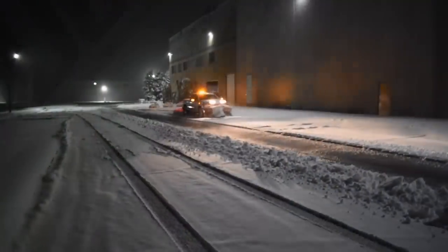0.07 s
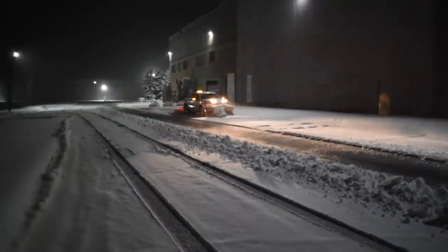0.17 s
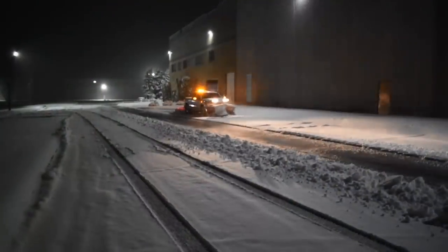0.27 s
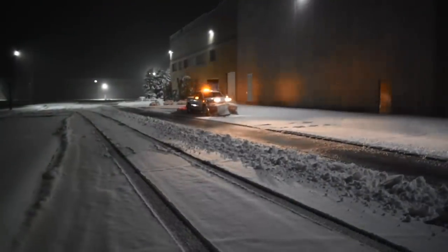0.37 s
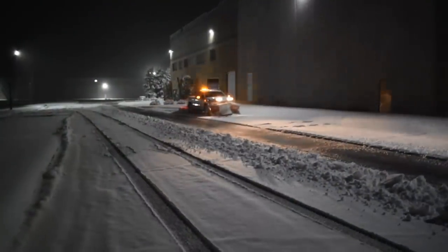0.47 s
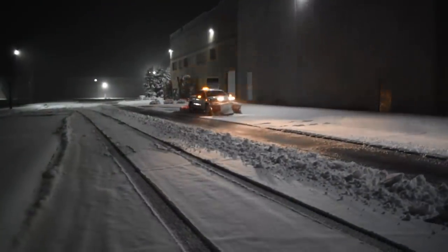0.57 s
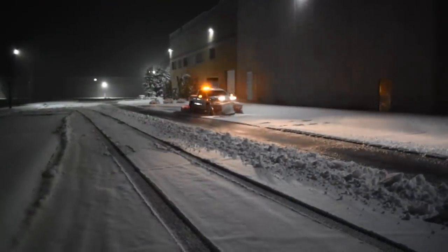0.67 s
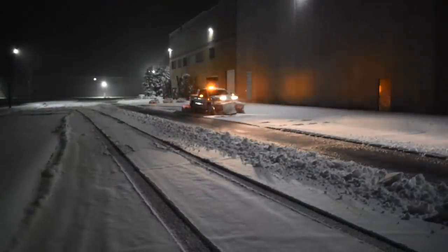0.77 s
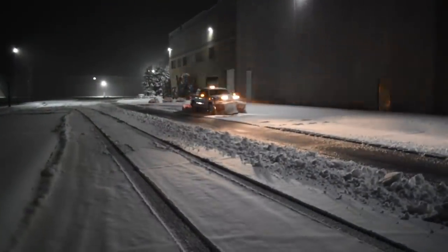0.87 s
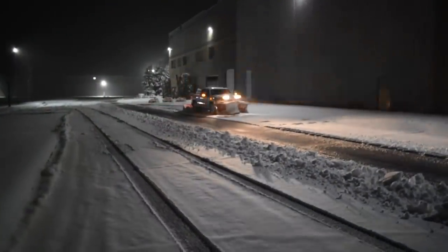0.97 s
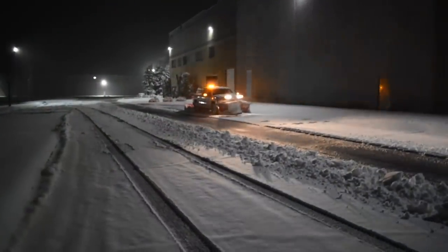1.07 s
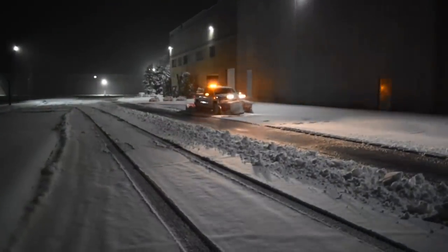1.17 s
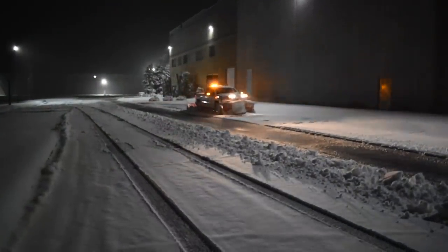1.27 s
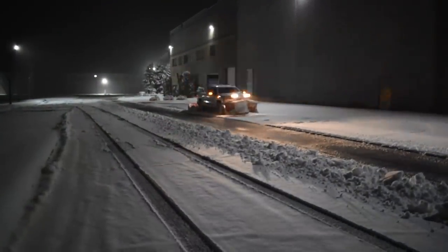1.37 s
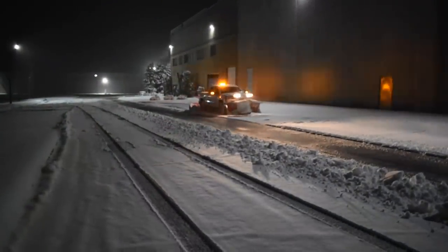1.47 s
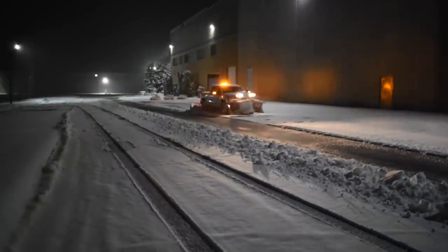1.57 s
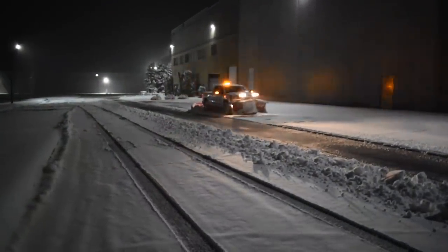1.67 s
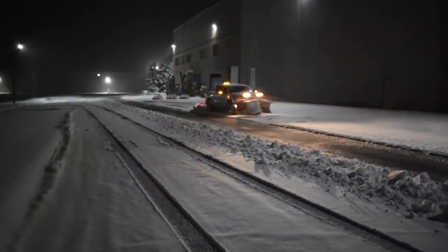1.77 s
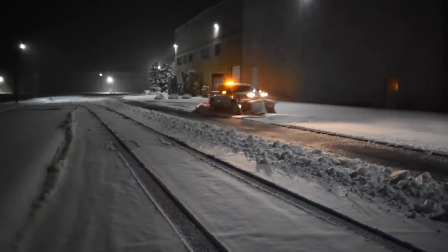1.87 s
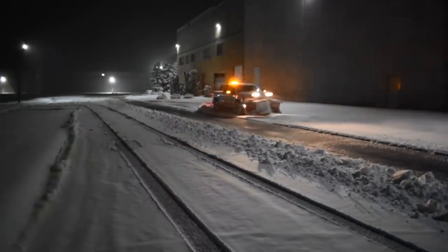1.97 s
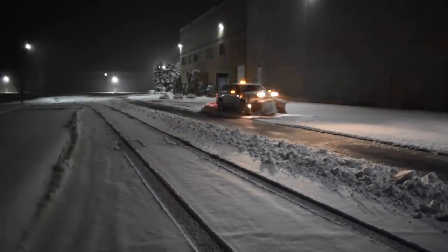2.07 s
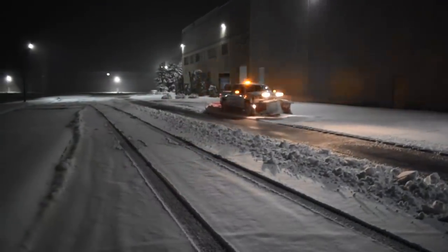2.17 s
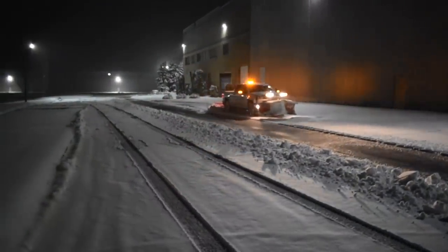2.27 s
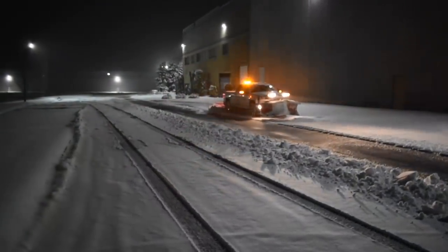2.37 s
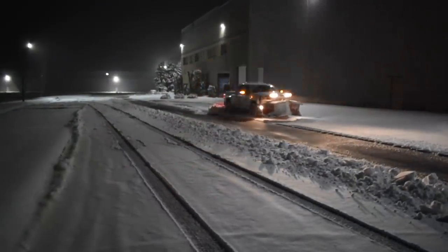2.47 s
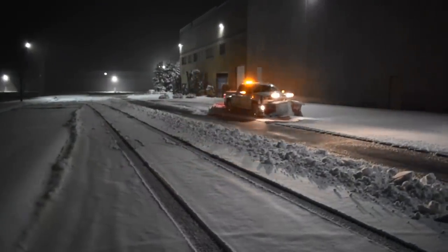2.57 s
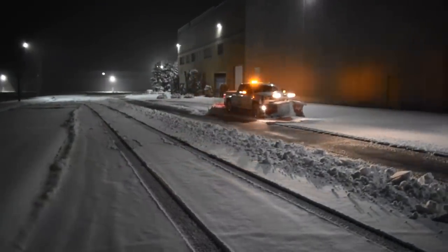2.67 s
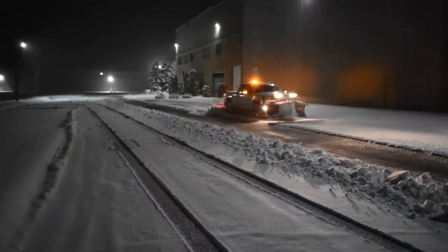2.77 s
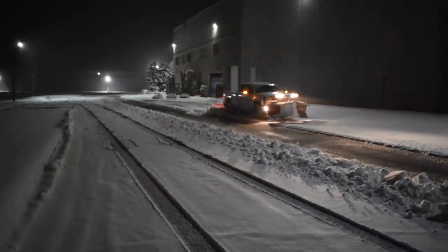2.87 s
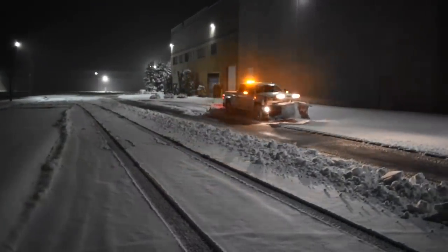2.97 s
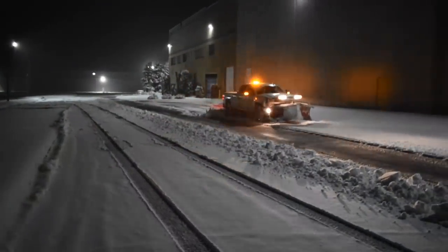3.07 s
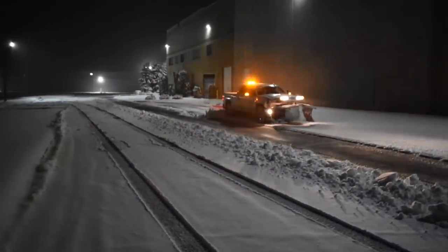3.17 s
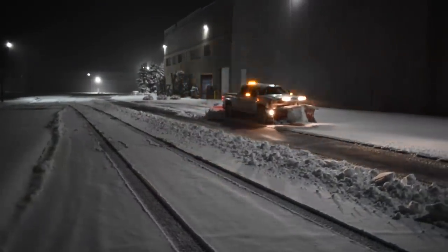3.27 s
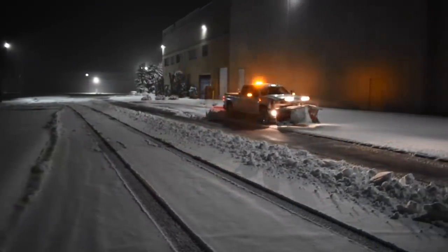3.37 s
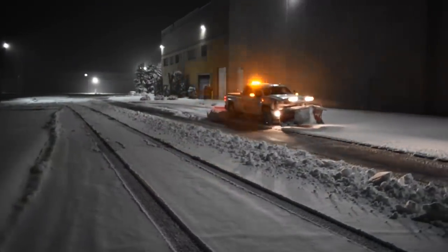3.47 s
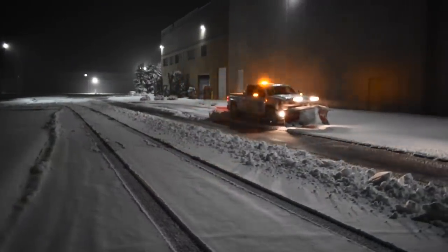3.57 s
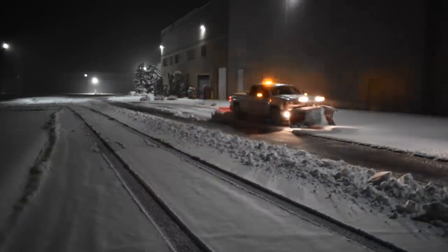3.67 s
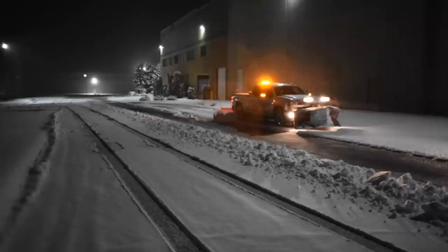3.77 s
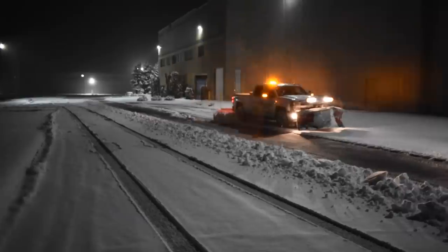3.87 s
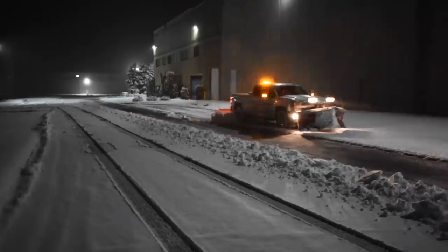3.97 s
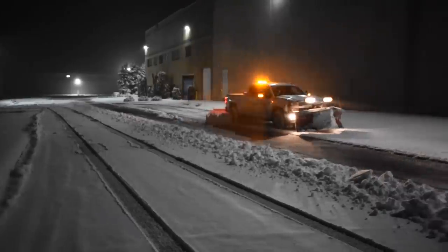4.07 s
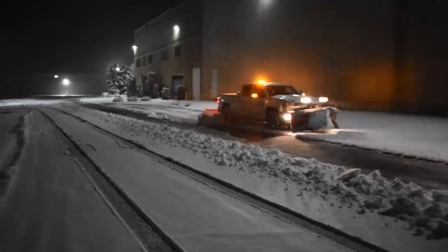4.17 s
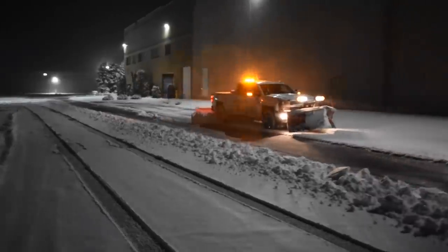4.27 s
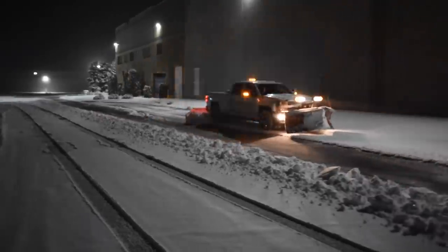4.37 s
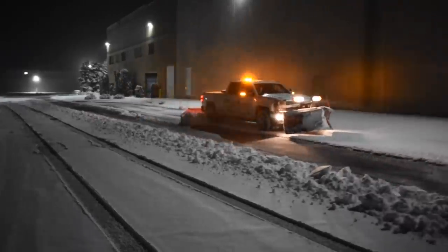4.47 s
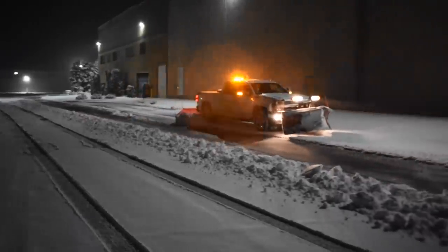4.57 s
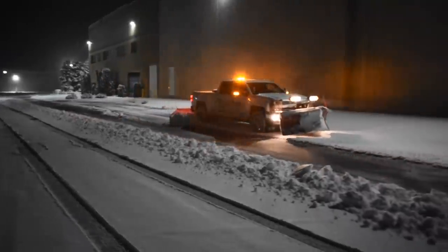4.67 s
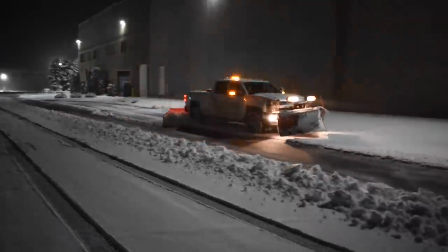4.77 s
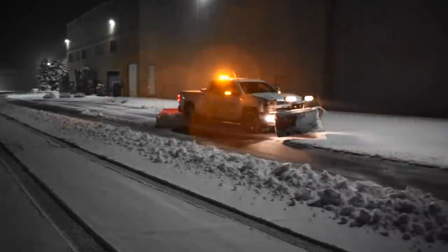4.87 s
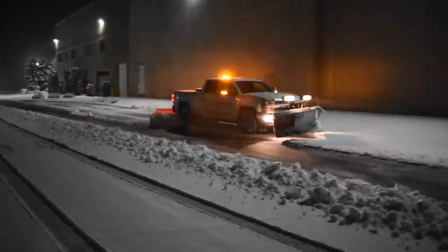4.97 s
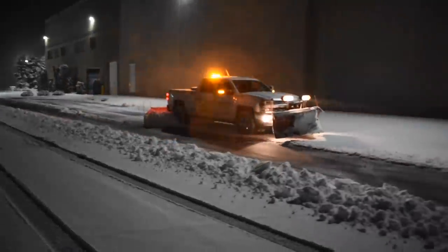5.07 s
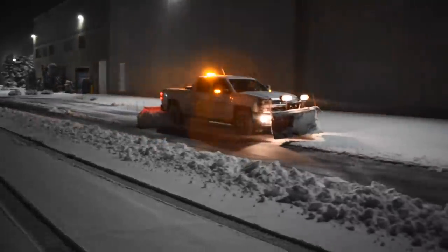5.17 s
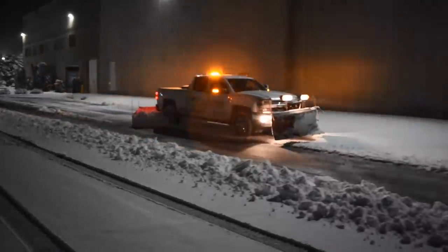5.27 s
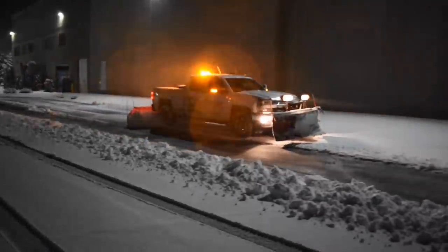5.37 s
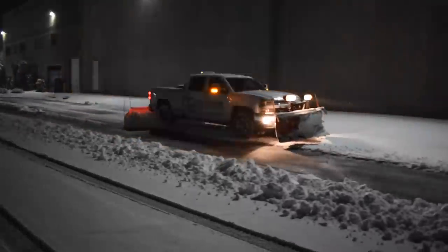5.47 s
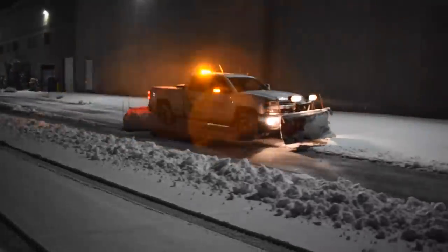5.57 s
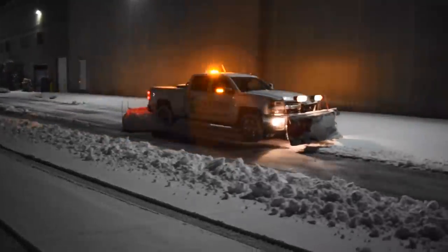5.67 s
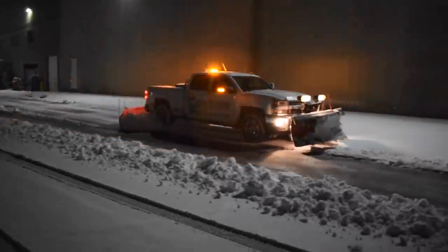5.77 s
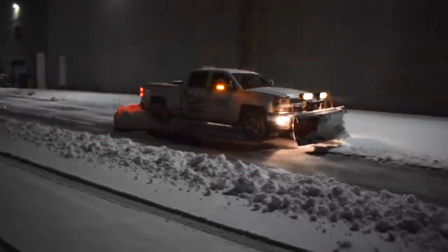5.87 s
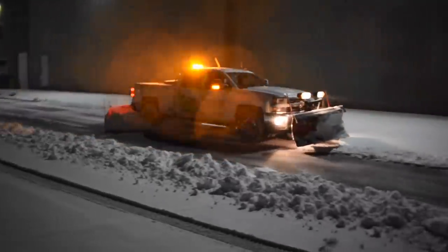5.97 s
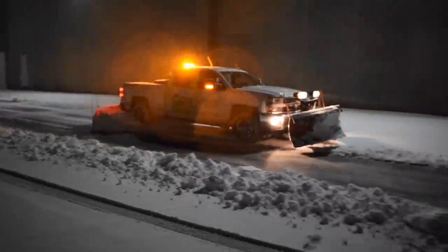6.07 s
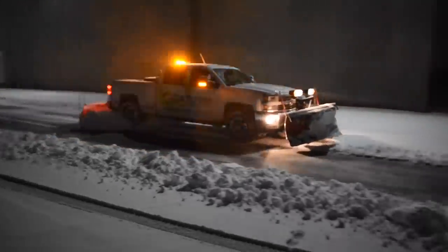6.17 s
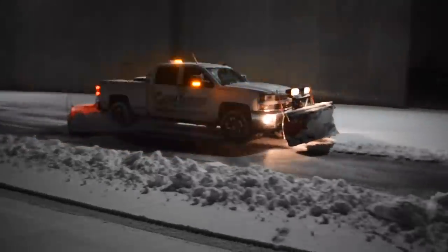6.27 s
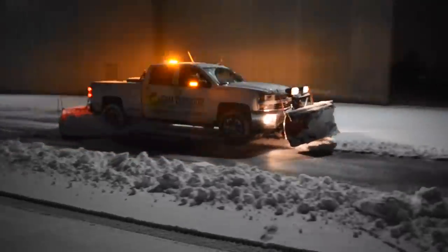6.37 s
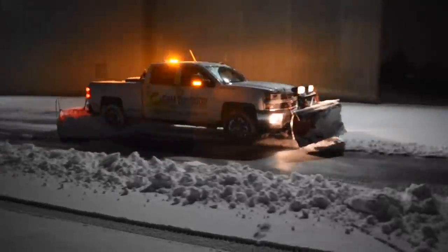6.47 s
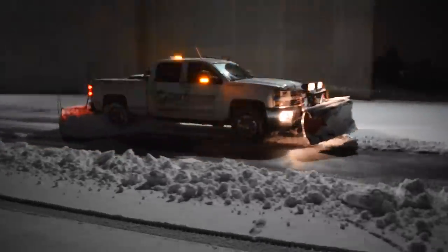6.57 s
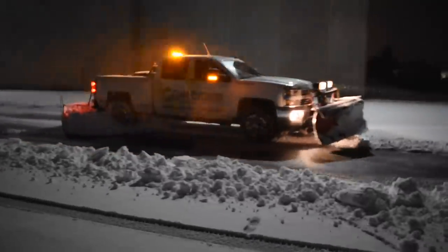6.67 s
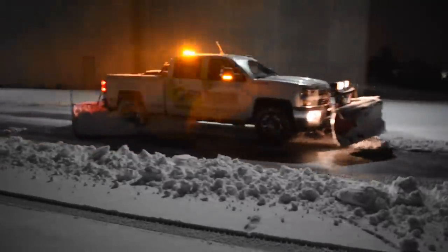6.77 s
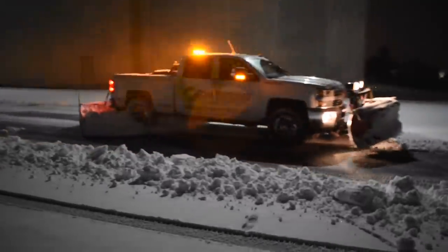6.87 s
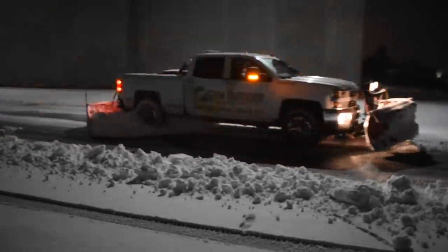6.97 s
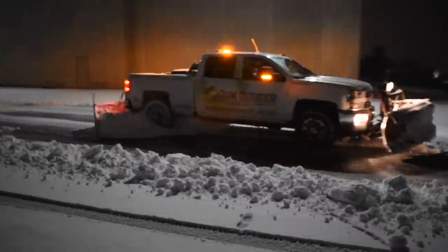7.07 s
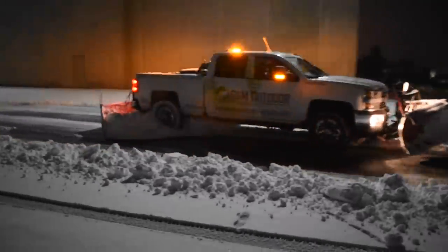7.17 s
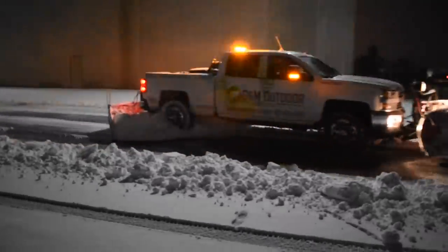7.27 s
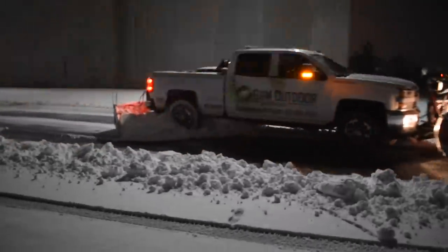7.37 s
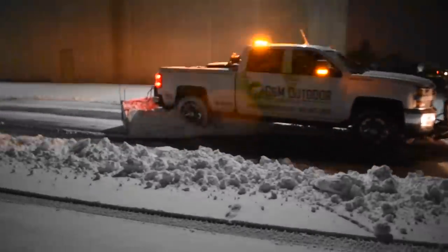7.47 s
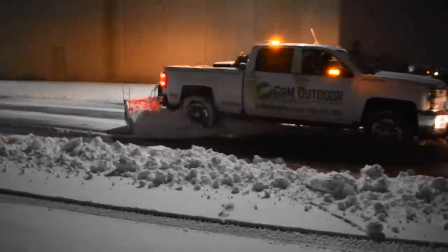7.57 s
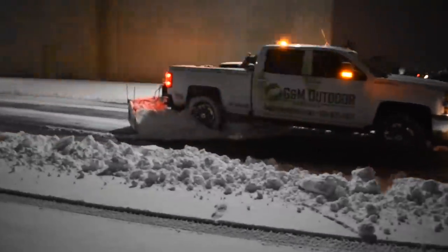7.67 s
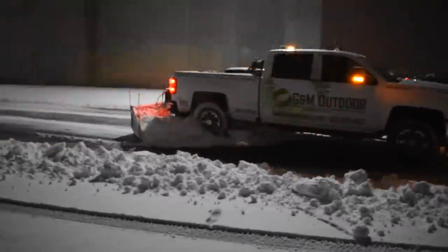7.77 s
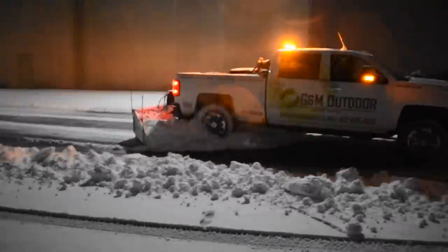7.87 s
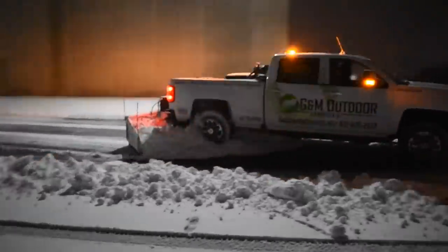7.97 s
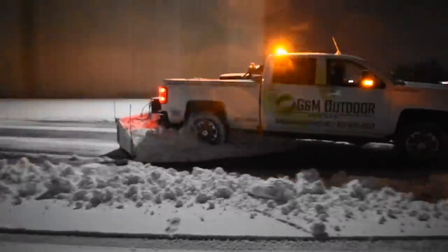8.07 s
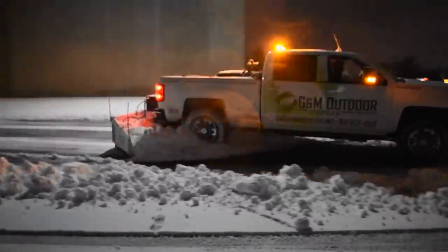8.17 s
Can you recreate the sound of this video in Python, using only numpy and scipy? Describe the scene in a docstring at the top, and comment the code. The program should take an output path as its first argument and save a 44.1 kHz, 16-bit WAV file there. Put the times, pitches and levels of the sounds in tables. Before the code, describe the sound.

A pickup truck plows wet snow outdoors, growing steadily louder as it slowly approaches. From the start its low exhaust burbles over the dull roar of pushed snow, with a thin, faint whine until about 3 seconds. Small distant blade scrapes and ticks come around 1 and 2 seconds. At about 4.3 seconds the engine sags as the driver lifts off, recovering by 5, while a damp brake gives a few faint, very high squeaks. Slush hisses and crackles more brightly as the truck nears. From 5.5 seconds the steel edge grates on pavement, hardest between 6 and 6.4, with sharp clacks and one dull knock. More gritty scrapes and clacks follow around 6.8, 7.1 and 7.6 seconds. The truck is alongside, a few metres away, from about 7 seconds to the end. A wall faintly echoes the plow, and light wind buffets the microphone, gusting near 6.4 and 8 seconds.

```python
"""Pickup ploughing snow at night

A V8 pickup ploughs wet snow along a warehouse wall, nearing slowly until it passes a few metres away.
The exhaust burbles and sags once as the driver lifts off. Pushed snow roars dully and slush hisses;
now and then the steel edge grates and clacks on bare pavement and a damp brake squeaks.
The wall echoes the plough; light wind buffets the microphone."""
import sys
import numpy as np
from scipy import signal
from scipy.fft import rfft, irfft
from scipy.io import wavfile

SR = 44100
rng = np.random.default_rng(int(sys.argv[2]) if len(sys.argv) > 2 else 0)


def file_out(sig):
    """Save sig as 16-bit WAV at sys.argv[1]."""
    # one column per channel
    cols = np.atleast_2d(sig).T
    # limit, then scale
    lim = np.clip(cols, -1, 1)
    pcm = np.round(lim * 32767).astype(np.int16)
    wavfile.write(sys.argv[1], SR, pcm)


N = 362502
T = np.arange(N) / SR


def engine(sag_hz=2.85, jitter=0.0021, waver_db=1.3, dispersion_rad=0.1994, smear_rad=0.91):
    """V8 exhaust harmonics over a turbulent drone, with faint high harmonics from the engine bay."""
    # four-stroke cycle rate at steady throttle: t/s, f/Hz
    cruise = [(0, 12.55), (.45, 12.68), (.85, 12.38), (1.6, 12.9), (1.85, 13.4), (3.1, 14.38), (4.2, 14.25),
              (5.45, 14.3), (6.4, 13.75), (7.35, 13.51), (8.0, 14.0)]
    # exhaust harmonics: multiple of cycle rate, gain ahead/dB, gain side/dB
    harmonics = [(3, -3.5, -11), (5, 0, 1), (6, -4.5, -15), (7, -2.5, -1.5), (8, 0, -0.5), (10, -16, -5.5),
                 (11, -10.5, -17), (12, -18.5, -11.5), (13, -12.5, -21), (14, -8.5, -29.5),
                 (16, -15.5, -19.5), (18, -37.5, -11.5), (19, -45, -18.5), (20, -48, -14)]
    # drive of the firing tone and its octave: t/s, level/dB
    firing = [(0, -25), (1.5, -25.5), (2, -32), (2.4, -28), (2.9, -26), (3.5, -29.5), (4.25, -26),
              (4.55, -18), (4.75, -14.5), (4.88, -20), (7.5, -18), (7.95, -13.5), (8.22, -16)]
    # deep hum (harmonic 5) over the burble: t/s, gain/dB
    hum = [(0, 0), (1.6, 6), (2.85, -7.5), (3.7, 1), (5.1, 3), (5.9, -2), (6.4, -4.5), (7.5, 1.5),
           (8.22, -0.5)]
    # exhaust turbulence spectrum: f/Hz, level/dB
    drone = [(15, -5), (32, -6.5), (48, -2), (70, -2), (135, 2), (190, -7.5), (220, -16.5), (400, -31.5),
             (1500, -76)]
    side, lift, firing_db = side_view(), lift_off(), in_time(firing)
    cycle_hz = (in_time(cruise) - sag_hz * lift) * (1 + jitter * drift(6.7))
    cycle_rad = 2 * np.pi * np.cumsum(cycle_hz) / SR
    burble_db = at_distance(-20.5, falloff=0.9) - 4.5 * lift  # uneven banks burble more under load
    drive_db = {5: burble_db + in_time(hum), 8: firing_db, 16: firing_db}
    exhaust = np.zeros(N)
    for k, ahead_db, side_db in harmonics:
        level_db = drive_db.get(k, burble_db) + ahead_db + side * (side_db - ahead_db)
        level_db += waver_db * drift(4.1)
        # low harmonics stay in step and throb once a cycle; the silencer delays higher ones
        lag_rad = dispersion_rad * (k - 6) ** 2 + smear_rad * drift(0.46)
        exhaust += np.sqrt(2) * from_db(level_db) * np.sin(k * cycle_rad - lag_rad)
    exhaust += from_db(6.5) * resonate(exhaust, hz=182, width_hz=13)  # tailpipe boom
    exhaust -= from_db(-1.5) * resonate(exhaust, hz=226, width_hz=22)  # silencer side chamber
    bay = sum(from_db(3 * drift(1.5)) * np.sin(k * cycle_rad + rng.uniform(0, 2 * np.pi))
              for k in range(27, 56))
    drone_gain = from_db(at_distance(-21.5, falloff=0.73))
    return exhaust + drone_gain * (noise(drone) + from_db(-26.5) * bay)


def lift_off():
    """Throttle lift: 0 at steady throttle, towards 1 with the foot off."""
    return swell_and_fade(start_s=4.24, length_s=0.53, attack_s=0.2, release_s=0.13)


def pushed_snow(churn_db=0.5, lift_db=-3.5):
    """Snow rolls ahead of the blade with a dull roar and sets the frame humming."""
    # rolling snow spectrum: f/Hz, level/dB
    rolling = [(130, -19), (230, 5.5), (310, -1.5), (480, 2.5), (800, 0.5), (1100, -1), (1350, -4),
               (1550, -4.5), (1850, -12), (2500, -14.5), (4000, -22.5), (8000, -34), (16000, -62)]
    # plough frame modes: f/Hz, width/Hz, gain ahead/dB, gain side/dB
    frame_modes = [(373.4, 26, -8.5, -30), (463.6, 12, -14, -12.5), (554, 54, -41, -8.5),
                   (653, 16, -22, -19), (768, 21, -22, -14)]
    side = side_view()
    roar, drag = noise(rolling), rng.standard_normal(N)
    for hz, width_hz, ahead_db, side_db in frame_modes:
        roar += from_db(ahead_db + side * (side_db - ahead_db)) * rms_one(resonate(drag, hz, width_hz))
    level_db = at_distance(-25, falloff=0.58) + lift_db * lift_off() + churn_db * drift(29)
    return from_db(level_db) * roar


def slush(shadow_db=-11.5, crackle_db=-7, flutter_db=0.38):
    """Slush hisses and crackles under the tyres; the blade hides them from ahead."""
    # slush spectrum: f/Hz, level/dB
    spectrum = [(400, -2), (1200, 9.5), (2500, 8.5), (3600, 3.5), (6000, 3), (8000, -1.5), (10000, -3),
                (16000, -10.5)]
    hiss = rng.standard_normal(N) + from_db(crackle_db) * crunch(per_s=500, spread_db=1.5, decay_s=0.00095)
    level_db = at_distance(-26.5, falloff=0.95) + shadow_db * (1 - side_view()) + flutter_db * drift(22)
    return from_db(level_db) * rms_one(colour(hiss, spectrum))


def scraping(slide_db=-4, bear_down_db=4):
    """The edge sticks and slips over pavement, shaking the blade and crushing grit."""
    # pavement contacts: start/s, length/s, grating/dB, grit/dB
    scrapes = [(0.954, 0.044, -33.5, -40.5), (1.035, .05, -38, -48), (1.085, 0.34, -41.5, -49.5),
               (1.85, 0.05, -53, -51), (4.321, .05, -35, -39), (5.535, .05, -27, -47),
               (5.62, 0.43, -36, -41.5), (6.048, 0.35, -16.5, -32), (6.733, 0.18, -26, -30),
               (6.938, .15, -20.5, -29), (7.443, .24, -20.5, -24.5)]
    # stick-slip spectrum: f/Hz, level/dB
    slip_spectrum = [(150, -34), (400, -4), (800, 1.5), (1500, 0), (2800, -1.5), (4000, -9.5), (6000, -24),
                     (16000, -30.5)]
    # crushed grit spectrum: f/Hz, level/dB
    grit_spectrum = [(1000, 0), (3000, 2.5), (5500, 4.5), (8000, -3), (10000, -4), (16000, -16)]
    grating_gain, grit_gain = np.zeros((2, N))
    for start_s, length_s, grating_db, grit_db in scrapes:
        contact = swell_and_fade(start_s, length_s, attack_s=0.015, release_s=0.048)
        pressure = arch(start_s, length_s, skew=1.4)  # hardest just past the middle
        contact *= from_db(bear_down_db * (pressure - 1))
        grating_gain += contact * from_db(grating_db)
        grit_gain += contact * from_db(grit_db)
    slips = crunch(per_s=380, spread_db=1.5, decay_s=0.0013) + from_db(slide_db) * rng.standard_normal(N)
    grains = crunch(per_s=550, spread_db=5, decay_s=0.0024)
    grating = rms_one(blade(colour(slips, slip_spectrum), ring_db=0))
    grit = rms_one(colour(grains, grit_spectrum))
    return grating_gain * grating + grit_gain * grit


def clacks(gain_db=-3):
    """The edge snags on a joint or stone and springs free."""
    # snags: t/s, relative level/dB
    snags = [(0.9842, -35), (1.068, -39), (1.868, -32), (1.906, -27.5), (4.3654, -25), (5.036, -27.5),
             (5.5647, -22.5), (6.061, -17.5), (6.26, -10), (6.332, -11), (6.3726, -13), (6.8349, -9),
             (6.8758, -12.5), (7.105, -7), (7.6923, -8)]
    # impact spectrum: f/Hz, level/dB
    spectrum = [(300, -23), (1200, 7.5), (3000, 7), (5500, 1.5), (9000, -13), (16000, -22)]
    clicks = np.zeros(N)
    for at_s, db in snags:
        clicks[round(at_s * SR)] = from_db(db + gain_db)
    return blade(colour(bursts(clicks, decay_s=0.0034), spectrum), ring_db=-11)


def blade(contact, ring_db):
    """A contact heard directly and through the ringing steel."""
    # blade modes: f/Hz, width/Hz, gain/dB
    modes = [(816, 90, -6), (1250, 260, -1.5), (1520, 52, 4), (2100, 350, -3), (2410, 120, -4.5),
             (3090, 15, 0), (3800, 90, -11)]
    ring = sum(from_db(db) * resonate(contact, hz, width_hz) for hz, width_hz, db in modes)
    return contact + from_db(ring_db) * ring


def knock(at_s=6.3478, hz=520, width_hz=260, peak_db=-8):
    """The blade drops once against its mount with a dull knock."""
    impulse = np.full(N, 1e-18)
    impulse[round(at_s * SR)] = 1
    thud = resonate(resonate(impulse, hz, width_hz), hz, 2 * hz)
    return from_db(peak_db) * thud / np.abs(thud).max()


def squeaks(spread_hz=75, flutter_db=3):
    """A damp brake disc sings briefly, very high."""
    # brake squeaks: start/s, length/s, f/Hz, level/dB
    events = [(3.89, .08, 14150, -52), (4.52, .1, 14330, -51), (4.62, .17, 14420, -50.5),
              (6.02, .05, 14400, -43)]
    tones, waver_hz = np.zeros(N), spread_hz * drift(60)
    for start_s, length_s, hz, db in events:
        phase_rad = 2 * np.pi * np.cumsum(hz + waver_hz) / SR
        tones += from_db(db) * arch(start_s, length_s) * np.sin(phase_rad)
    return tones * from_db(flutter_db * drift(30))


def whine(level_db=-42.5):
    """A thin, unsteady engine-bay whine swells and fades while the truck is far off."""
    tone = rms_one(resonate(rng.standard_normal(N), hz=774, width_hz=4))
    return from_db(level_db) * arch(start_s=0.24, length_s=2.96) * tone


def wall_echo(x, far_s=0.018, near_s=0.045, gain_db=-18.5):
    """Reflection off the wall behind the truck; the detour lengthens as it draws alongside."""
    delay_s = far_s + (near_s - far_s) * side_view()
    return from_db(gain_db) * np.interp(T - delay_s, T, x, left=0)


def wind(breeze_db=-27):
    """Slow pressure lumps at the microphone port: a light breeze with a few gusts."""
    # gusts: peak time/s, half width/s, level/dB
    gusts = [(4.15, 0.18, -19.5), (6.44, 0.041, -11), (7.3, 1, -24), (8.1, 0.074, -9.5)]
    # buffeting spectrum: f/Hz, level/dB
    buffet = [(3, -12), (9, 2.5), (15, -4.5), (25, -12.5), (60, -46), (200, -38.5), (1000, -93)]
    gust_gain = sum(from_db(db) * np.exp(-((T - at_s) / width_s) ** 2) for at_s, width_s, db in gusts)
    return (from_db(breeze_db) + gust_gain) * noise(buffet)


def closeness(alongside_s=7.235, nearest_m=5.6, speed_m_per_s=4.0):
    """Nearest over present distance on a straight approach; holds at 1 once alongside."""
    return nearest_m / np.hypot(nearest_m, speed_m_per_s * np.maximum(alongside_s - T, 0))


def side_view():
    """Truck aspect: 0 from ahead, 1 from the side."""
    return closeness() ** 2


def at_distance(alongside_db, falloff):
    """Level/dB of a source on the truck; amplitude goes as distance ** -falloff."""
    return alongside_db + falloff * 20 * np.log10(closeness())


def swell_and_fade(start_s, length_s, attack_s, release_s):
    """Rises towards 1 for length_s, then decays."""
    held_s = np.clip(T - start_s, 0, length_s)
    released_s = np.maximum(T - start_s - length_s, 0)
    return (1 - np.exp(-held_s / attack_s)) * np.exp(-released_s / release_s)


def arch(start_s, length_s, skew=1):
    """Half-sine envelope; skew above 1 delays the peak."""
    return np.sin(np.pi * np.clip((T - start_s) / length_s, 0, 1) ** skew)


def crunch(per_s, spread_db, decay_s):
    """Random small fractures of uneven size, unit power."""
    sizes = from_db(spread_db * np.minimum(rng.exponential(1, N), 3))
    return rms_one(bursts(sizes * (rng.random(N) < per_s / SR), decay_s))


def bursts(clicks, decay_s):
    """Each click releases a decaying puff of noise."""
    envelope = signal.lfilter([1], [1, -np.exp(-1 / (decay_s * SR))], clicks + 1e-18)
    return envelope * rng.standard_normal(N)


def resonate(x, hz, width_hz):
    """One resonance, unit peak gain."""
    r = np.exp(-np.pi * width_hz / SR)
    feedback = [1, -2 * r * np.cos(2 * np.pi * hz / SR), r * r]
    return signal.lfilter(np.array([1, 0, -1]) * (1 - r * r) / 2, feedback, x)


def noise(spectrum):
    """Coloured noise, unit power."""
    return rms_one(colour(rng.standard_normal(N), spectrum))


def colour(x, spectrum, size=32768):
    """Minimum-phase filter from rows of f/Hz, gain/dB."""
    hz, db = np.transpose(spectrum)
    grid_hz = np.maximum(np.arange(size // 2 + 1) * SR / size, 1)
    gain = from_db(np.interp(np.log(grid_hz), np.log(hz), db))
    cepstrum = irfft(np.log(gain))[:size // 2]
    cepstrum[1:] *= 2
    response = irfft(np.exp(rfft(cepstrum, size)))[:size // 2]
    return signal.fftconvolve(x, response)[:N]


def drift(rate_hz, hop=40, settle=2000):
    """Slow random wander, unit spread."""
    r = np.exp(-2 * np.pi * rate_hz * hop / SR)
    white = rng.standard_normal(N // hop + settle + 2)
    slow = signal.lfilter([1], [1, -2 * r, r * r], white)[settle:]
    return np.interp(np.arange(N) / hop, np.arange(len(slow)), rms_one(slow))


def in_time(curve):
    """Rows of t/s, value, interpolated at every sample."""
    return np.interp(T, *np.transpose(curve))


def rms_one(x):
    """Scale to unit power."""
    return x / np.sqrt(np.mean(x ** 2) + 1e-20)


def from_db(db):
    """Decibels to gain."""
    return 10 ** (np.asarray(db) / 20)


def scene():
    """Truck, plough, wall and wind; mono."""
    plough = pushed_snow() + slush() + scraping() + clacks() + knock() + squeaks()
    return (engine() + whine() + plough + wall_echo(plough) + wind())[None]


def record(dry, ceiling=0.95, cutoff_hz=15850):
    """The microphone port ripples the treble; peaks are clipped and the top is cut."""
    # port response: f/Hz, gain/dB
    port = [(4400, -0.5), (5000, -2.5), (6000, -2), (6600, -4.5), (7900, 3), (8800, -4), (9900, -4),
            (10500, -7.5), (11500, -3.5), (14000, 1)]
    clipped = np.clip(colour(dry[0], port), -ceiling, ceiling)
    low_pass = signal.ellip(12, 0.1, 90, cutoff_hz, fs=SR, output="sos")
    return signal.sosfilt(low_pass, clipped)[None]


dry = scene()
out = record(dry)
file_out(out)
```